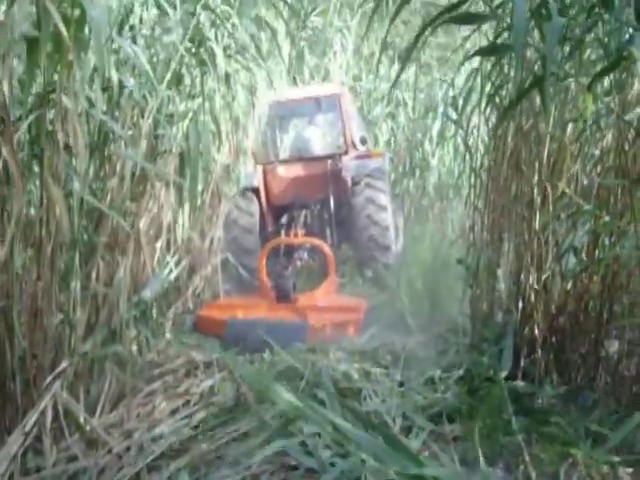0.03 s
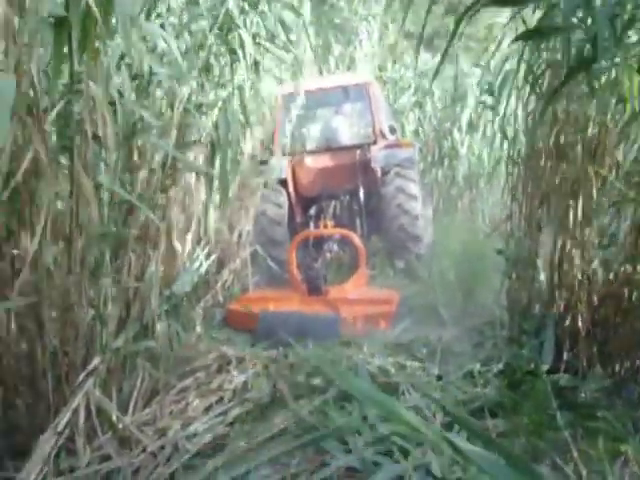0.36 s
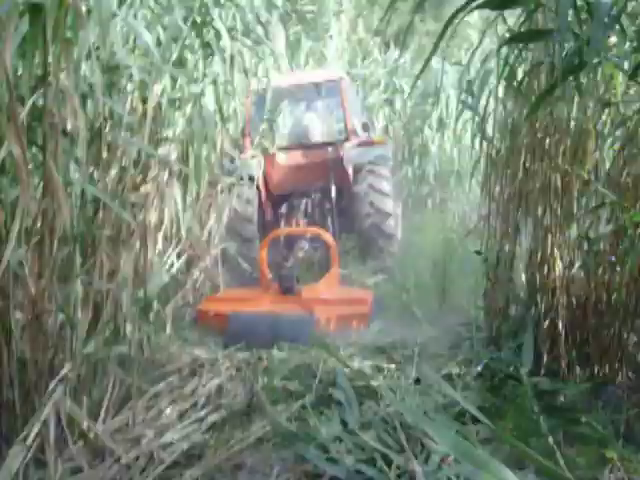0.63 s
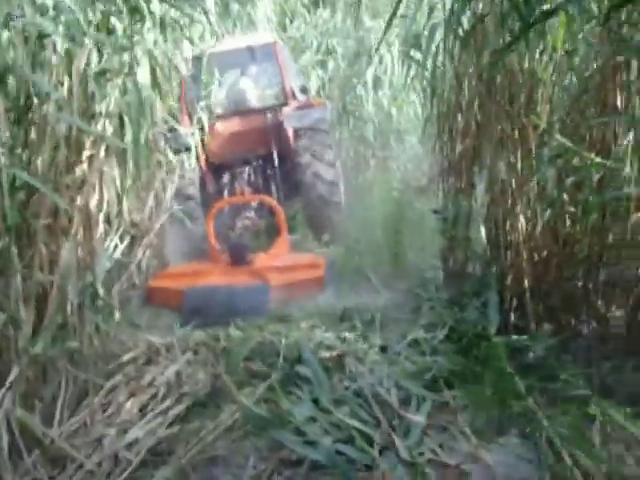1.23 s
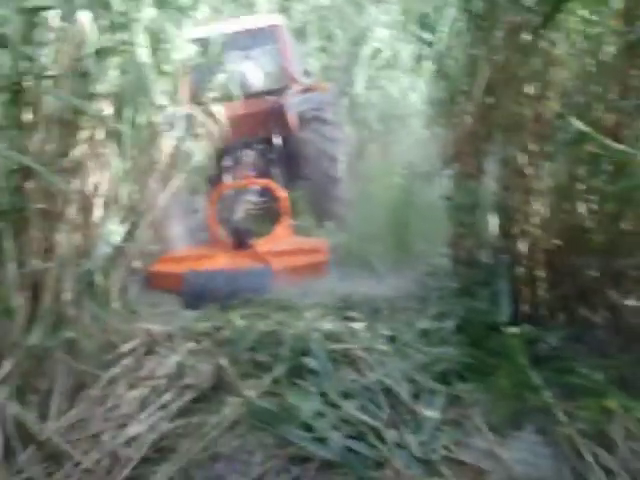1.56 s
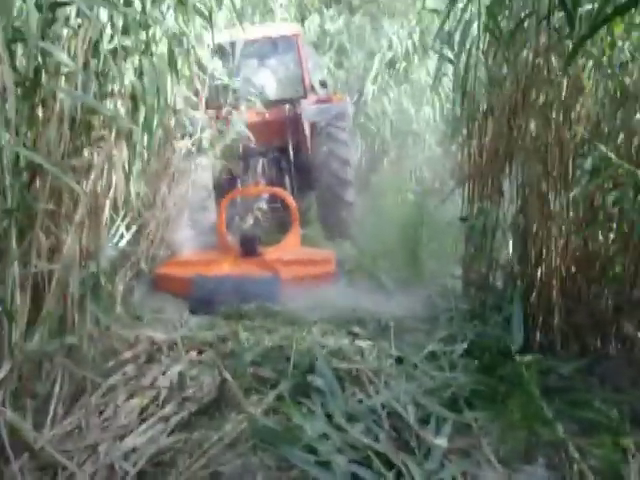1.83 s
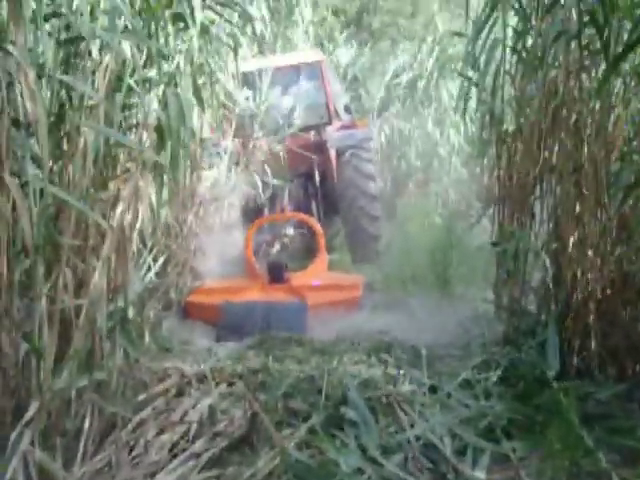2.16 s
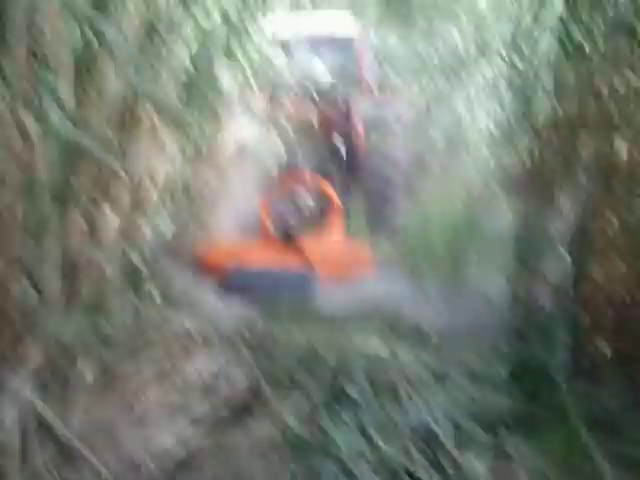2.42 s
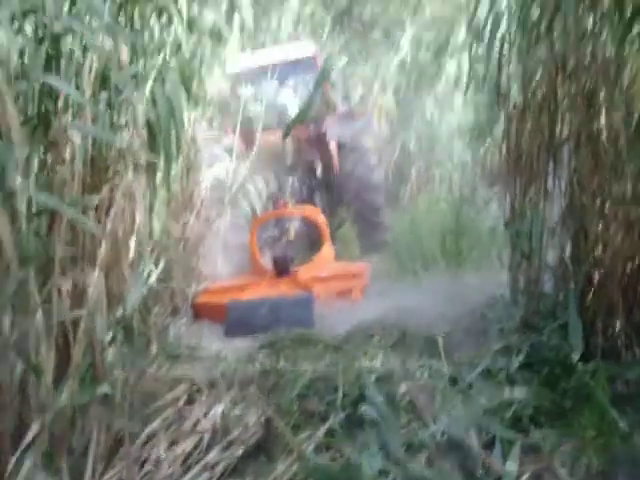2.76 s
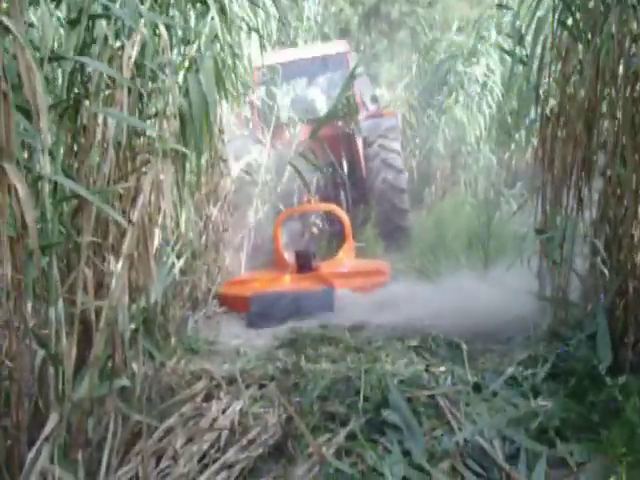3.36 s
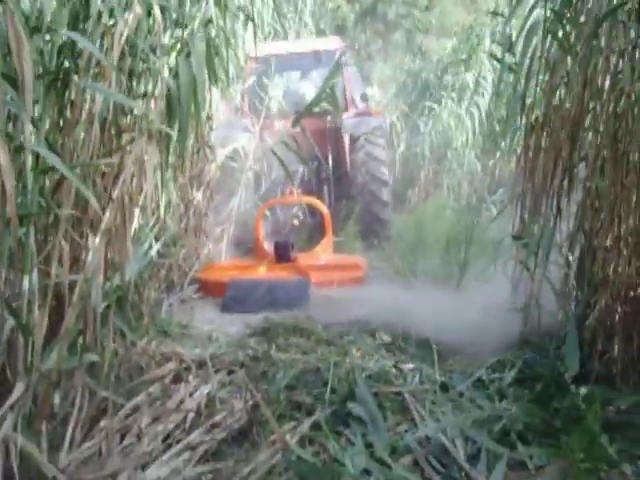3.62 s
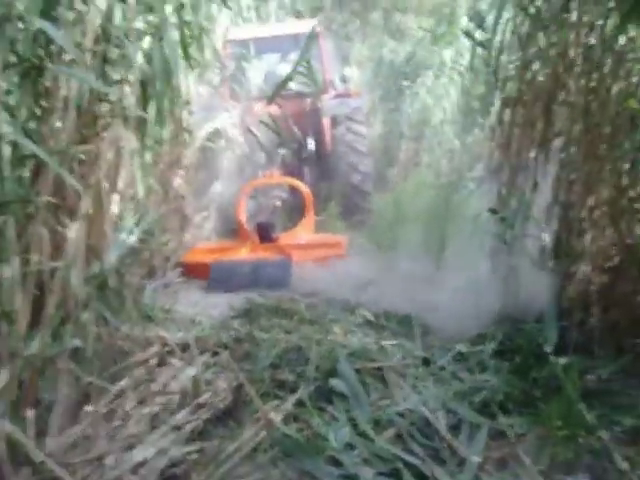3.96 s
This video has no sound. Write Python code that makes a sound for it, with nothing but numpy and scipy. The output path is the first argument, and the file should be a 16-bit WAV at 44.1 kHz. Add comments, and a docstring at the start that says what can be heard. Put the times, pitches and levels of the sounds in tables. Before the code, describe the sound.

A tractor-driven mulcher shreds tall cane, droning and rattling, with sharp cracks growing louder.

```python
"""A diesel tractor drives a chain mulcher through giant cane. From the start the rotor drones at each
bite over the faint engine, stalks tear and splinters rattle, dense and bright; early on a caught stalk
knocks. Hard pieces crack against the steel deck, sparsely at first, then from 2.9 s louder and longer,
with metallic pings. In the last second the blows overload the microphone."""
import sys
import numpy as np
from scipy import signal
from scipy.fft import rfft, irfft
from scipy.io import wavfile
from scipy.ndimage import uniform_filter1d

SR = 44100
rng = np.random.default_rng(int(sys.argv[2]) if len(sys.argv) > 2 else 0)


def dump_mix(stems):
    """Bounce the given channels to the path in sys.argv[1] as a 16-bit WAV at rate SR."""
    frames = np.atleast_2d(stems).T  # one column per channel
    limited = np.clip(frames, -1, 1)  # hard clip at full scale
    pcm = np.round(limited * 32767).astype(np.int16)
    wavfile.write(sys.argv[1], SR, pcm)


N = 176400
TIME_S = np.arange(N) / SR
BLOWS_PER_FIRING, BLOWS_PER_TURN = 1.413, 6


def undb(db):
    """Decibels to gain."""
    return 10 ** (np.asarray(db) / 20)


def unit(x):
    """Scale to rms 1."""
    return x / np.sqrt(np.mean(x ** 2))


def curve(table, column=1):
    """One table column, interpolated linearly in time."""
    rows = np.array(table, float)
    return np.interp(TIME_S, rows[:, 0], rows[:, column])


def walk(rate_hz):
    """Smooth random wander; rms 1."""
    hold = max(int(SR / rate_hz), 2)
    steps = rng.standard_normal(N)[np.arange(N) // hold]
    return unit(uniform_filter1d(uniform_filter1d(steps, hold), hold))


def colour(x, spectrum):
    """Filter by (frequency [Hz], gain [dB]) points; rms 1."""
    hz, db = np.array(spectrum, float).T
    bins_hz = np.maximum(np.fft.rfftfreq(N, 1 / SR), 1)
    gain = undb(np.interp(np.log(bins_hz), np.log(hz), db))
    return unit(irfft(rfft(x) * gain, N))


def ring(x, modes):
    """Parallel resonances, two peak filters in series each; rms 1."""
    out = 0
    for hz, width_hz, db in modes:
        b, a = signal.iirpeak(hz, hz / width_hz, SR)
        out += undb(db) * unit(signal.lfilter(b, a, signal.lfilter(b, a, x)))
    return unit(out)


def pulses(cycles, scatter_db, period, uneven_db):
    """One pulse per cycle; an uneven level pattern repeats every period pulses."""
    at = np.flatnonzero(np.diff(np.floor(cycles)) > 0)
    pattern = np.cos(2 * np.pi * np.arange(len(at)) / period)
    out = np.zeros(N)
    out[at] = undb(scatter_db * rng.standard_normal(N)[:len(at)] + uneven_db * pattern)
    return out


def snaps(rate_hz, spread_db):
    """Impulses of random time, size and sign."""
    size = undb(spread_db * np.clip(rng.standard_normal(N), -2, 2))
    return (rng.random(N) < rate_hz / SR) * size * rng.choice([-1, 1], N)


# exhaust spectrum (frequency [Hz], gain [dB])
EXHAUST_SPECTRUM = [(40, -29.5), (90, -5), (118, 3), (170, -19.5), (240, -18), (350, -6), (600, -5),
                    (1200, -11), (3000, -40.5)]


def engine(firings, level_db=-37.5):
    """Four uneven cylinders fire through the exhaust."""
    firing = pulses(firings, scatter_db=3.5, period=4, uneven_db=0.5)
    return undb(level_db) * colour(firing, EXHAUST_SPECTRUM)


# spells of knocking (centre [s], Gaussian width [s], level [dB])
KNOCK_SWELLS = [(.09, 0.066, -33), (.3, 0.037, -27.5), (1.08, 0.034, -35.5)]


def knocks(blows, pitch_hz=222, width_hz=96):
    """A stalk caught on a chain drums dully on the deck once a turn, in brief spells."""
    swell = sum(undb(db) * np.exp(-((TIME_S - centre_s) / width_s) ** 2 / 2)
                for centre_s, width_s, db in KNOCK_SWELLS)
    hits = pulses(blows / BLOWS_PER_TURN, scatter_db=1, period=2, uneven_db=6.5)
    return swell * ring(hits, [(pitch_hz, width_hz, 0)])


# hollow under the deck (frequency [Hz], width [Hz], gain [dB])
HOLLOW_MODES = [(169, 78, 1.5), (328.8, 99, 7)]
# rotor load, relative levels (time [s], hum at blow rate [dB], its octave [dB], tearing [dB])
ROTOR_LOAD = [(0, -37, -38.5, -23), (0.14, -39, -32, -22.5), (0.19, -44.0, -48, -26.5),
              (0.27, -42, -28, -19), (0.37, -36, -41, -23.5), (0.44, -36.5, -31.5, -24),
              (0.6, -44.5, -33, -27.5), (0.71, -54, -46.0, -25), (0.79, -41, -35.5, -31.5),
              (0.92, -50, -46.5, -29), (1.04, -37, -29.5, -23.5), (1.12, -28, -26, -21),
              (1.17, -45, -54, -25), (1.27, -30.5, -24, -24), (1.41, -44.5, -43, -26.5),
              (1.49, -33, -27, -25), (1.63, -37, -39.5, -26), (1.72, -30.5, -30.5, -24),
              (1.89, -43, -35.5, -24), (1.96, -47, -42, -32), (2.05, -30, -27.5, -26.5),
              (2.22, -48.0, -48, -30.5), (2.3, -25, -26, -24), (2.44, -39, -41.5, -25.5),
              (2.53, -31.5, -31, -26.5), (2.82, -39.5, -33.5, -30), (3.1, -35.5, -33, -24.5),
              (3.21, -43, -34, -17.5), (3.3, -47, -30.5, -25), (3.43, -35, -42, -17),
              (3.6, -32, -36.5, -28.5), (3.85, -51, -36, -27), (3.92, -29, -25.5, -21),
              (4.0, -52, -35, -18)]


def rotor(blows, hum_db=0.5, third_db=-14.5, drone_db=-9.5):
    """Sweeping chains pump the air: a wavering hum and a rough beat in the hollow, louder at each bite."""
    low_db, octave_db = curve(ROTOR_LOAD), curve(ROTOR_LOAD, column=2)
    hum = 0
    for harmonic, db in enumerate([low_db, octave_db, octave_db + third_db], 1):
        amplitude = np.sqrt(2) * undb(db + walk(50))
        hum += amplitude * np.sin(2 * np.pi * harmonic * (blows + 0.041 * walk(40)))
    beat = pulses(blows + 0.043 * walk(60), scatter_db=0.5, period=BLOWS_PER_TURN, uneven_db=8.5)
    drone = undb((low_db + octave_db) / 2 + drone_db) * ring(beat, HOLLOW_MODES)
    return undb(hum_db) * hum + drone


# tearing stalks (frequency [Hz], gain [dB])
TEAR_SPECTRUM = [(40, -16.5), (110, -12.5), (150, -1.5), (215, 2), (380, -1.5), (520, 2), (680, 0.5),
                 (850, -2.5), (1000, -2), (1250, -1), (1600, -2), (2200, -2), (3500, -14), (6000, -37.5)]
# buzzing deck panels (frequency [Hz], width [Hz], gain [dB])
PANEL_MODES = [(517.6, 37, -1.5), (624.6, 31, -2.5), (760, 10, -5.5), (980.6, 24, 0), (1188, 140, -3),
               (1460, 23, -5.5), (1490, 17, -8.5)]


def tearing(blows, tear_db=0.5, panel_db=-12):
    """Stalks tear in a spurt at each sweep and shake the deck panels."""
    sweep_db = 0.89 * np.cos(2 * np.pi * blows)
    turn_db = 1.7 * np.cos(2 * np.pi * blows / BLOWS_PER_TURN)
    spurts = undb(sweep_db + turn_db + 0.65 * walk(70))
    fibres = snaps(4500, spread_db=4) * spurts
    rip = undb(tear_db) * colour(fibres, TEAR_SPECTRUM)
    buzz = undb(panel_db) * ring(fibres, PANEL_MODES)
    return undb(curve(ROTOR_LOAD, column=3)) * (rip + buzz)


# splinter flow under the deck (time [s], relative level [dB])
SPLINTER_FLOW = [(0.0, -20), (0.48, -16.5), (0.79, -21.5), (0.8, -14), (0.87, -21), (1.15, -18.5),
                 (1.18, -20.5), (1.28, -19), (1.35, -19), (1.82, -16.5), (1.87, -20), (1.98, -17),
                 (2.23, -18.5), (2.78, -16), (2.81, -18.5), (2.88, -15), (2.97, -18.5), (3.03, -12.5),
                 (3.43, -14.5), (3.83, -14.5), (3.93, -12.5), (4.0, -9)]
# dry splinters (frequency [Hz], gain [dB])
SPLINTER_SPECTRUM = [(200, -30.5), (1500, -20.5), (2100, -22), (2500, -8.5), (3200, -7), (3650, -2),
                     (4000, 0.5), (4400, 0), (4800, -8), (5300, -13), (5800, -26), (6200, -24.5)]
# ringing deck and chains (frequency [Hz], width [Hz], gain [dB])
STEEL_MODES = [(2203, 35, -13.5), (2428, 54, -7.5), (2700, 40, -12.5), (3064, 98, -3.5), (3330, 58, -5.5),
               (3750, 134, 3.5), (3857, 99, -3.5), (4053, 80, 3.5), (4258, 260, 0.5), (4420, 92, -14.5)]


def splinters(blows, flow_db=-0.5, links_db=-6.5):
    """Dry splinters rattle under the deck, throbbing with the rotor, while chain links jingle."""
    turn_rad = 2 * np.pi * blows / BLOWS_PER_TURN
    throb_db = 0.5 * np.cos(turn_rad) + 0.27 * np.cos(2 * turn_rad)
    flutter_db = walk(90) + 0.95 * walk(300)
    hail = colour(snaps(7000, spread_db=2.5) * undb(throb_db + flutter_db), SPLINTER_SPECTRUM)
    links = undb(links_db) * ring(snaps(600, spread_db=5), STEEL_MODES)
    return undb(curve(SPLINTER_FLOW) + flow_db) * (hail + links)


# ringing blows (start [s], pitch [Hz], gain [dB])
STEEL_PINGS = [(2.89, 2210, -8.5), (3.0, 2210, -17), (3.174, 3140, -14), (3.401, 2420, -15),
               (3.47, 2180, -10.5), (3.484, 2420, -12), (3.565, 3050, -10.5), (3.739, 3040, -22.5),
               (3.923, 3000, -12)]


def pings(attack_s=0.0043, decay_s=0.015):
    """Single blows each set one steel part ringing briefly."""
    out = 0
    for start_s, hz, db in STEEL_PINGS:
        age_s = np.maximum(TIME_S - start_s, 0)
        envelope = np.minimum(age_s / attack_s, 1) * np.exp(-age_s / decay_s)
        out += undb(db) * envelope * np.sin(2 * np.pi * hz * age_s)
    return out


# hard pieces striking the deck (start [s], level [dB], rattle length [s])
DECK_HITS = [(.01, -20, 0.0081), (0.108, -19.5, 0.014), (.4, -26.5, 0.0074), (0.717, -18.5, .012),
             (.755, -24, .012), (0.793, -18, 0.021), (.982, -19.5, 0.0045), (1.122, -18.5, 0.0053),
             (1.26, -20, 0.03), (1.49, -15, 0.0087), (1.55, -21, 0.013), (1.761, -22, 0.033),
             (1.972, -21, 0.02), (2.114, -35, 0.0046), (2.675, -21, .03), (2.761, -18, 0.011),
             (2.872, -13.5, 0.038), (3.017, -12.5, 0.054), (3.149, -4.5, 0.073), (3.274, -9.5, .03),
             (3.361, -6, 0.054), (3.411, -6.5, .02), (3.46, -10.5, 0.079), (3.56, -10.5, 0.044),
             (3.648, -11.5, 0.046), (3.755, -14.5, 0.049), (3.877, -6.5, 0.076)]
# their rattle (frequency [Hz], gain [dB])
CRACK_SPECTRUM = [(60, -6.5), (400, -4.5), (1000, -6.5), (2000, -9), (3000, -1.5), (4000, -4), (4800, -3),
                  (5500, -28.5), (6200, -50.5)]


def cracks(attack_s=0.0018, decay_s=0.024, strike_boost=0.45, strike_decay_s=0.0059, ring_db=2.5):
    """A hard piece hits, rattles round the deck for a moment and sets the steel ringing."""
    power = 0
    for start_s, db, length_s in DECK_HITS:
        age_s = np.maximum(TIME_S - start_s, 0)
        envelope = np.minimum(age_s / attack_s, 1) * np.exp(-np.maximum(age_s - length_s, 0) / decay_s)
        strike = 1 + strike_boost * np.exp(-age_s / strike_decay_s)
        power += (undb(db) * envelope * strike) ** 2
    rattle = colour(snaps(4000, spread_db=2), CRACK_SPECTRUM)
    steel = undb(ring_db) * ring(snaps(1200, spread_db=3), STEEL_MODES)
    return np.sqrt(power) * unit(rattle + steel)


# engine speed (time [s], firing rate [Hz])
FIRING_RATE = [(0, 122), (.35, 121), (.65, 118.3), (1.0, 114.6), (1.28, 116.5), (1.85, 114.5), (2.3, 116.2),
               (2.8, 114.6), (3.2, 113.5), (4, 111)]


def scene():
    """Engine and mulcher turn together through the drive shaft."""
    firings = np.cumsum(curve(FIRING_RATE) * (1 + 0.002 * walk(10))) / SR
    blows = firings * BLOWS_PER_FIRING
    machine = engine(firings) + rotor(blows)
    cane = tearing(blows) + splinters(blows) + knocks(blows)
    return (machine + cane + cracks() + pings())[None]


def record(dry, swing=0.45, knee=0.36, bias_gain=0.67, bias_hz=110, band_hz=5850, top_hz=15800):
    """Overload rounds the peaks and shifts the microphone's bias in low thumps; a narrow band clips."""
    rounded = dry / (1 + (dry / swing) ** 4) ** (1 / 4)
    excess = np.maximum(np.abs(dry) - knee, 0)
    bias = bias_gain * signal.sosfilt(signal.butter(1, bias_hz, fs=SR, output="sos"), excess)
    centred = signal.sosfilt(signal.butter(2, 20, "high", fs=SR, output="sos"), rounded + bias)
    narrow = signal.sosfilt(signal.ellip(10, 0.2, 90, band_hz, fs=SR, output="sos"), centred)
    clipped = np.clip(narrow, -0.69, 0.69)
    return signal.sosfilt(signal.ellip(8, 0.2, 70, top_hz, fs=SR, output="sos"), clipped)


dry = scene()
out = record(dry)
dump_mix(out)
```